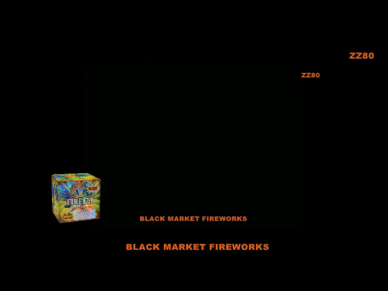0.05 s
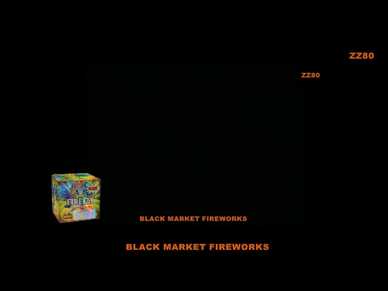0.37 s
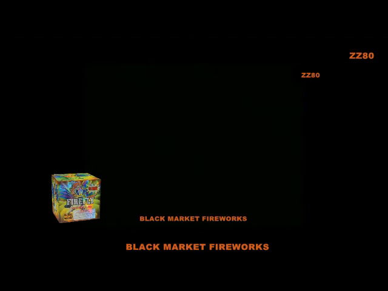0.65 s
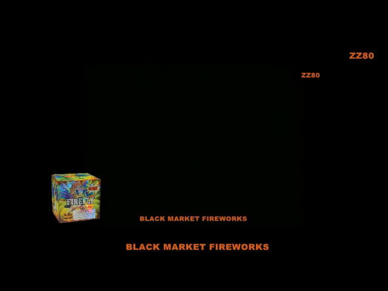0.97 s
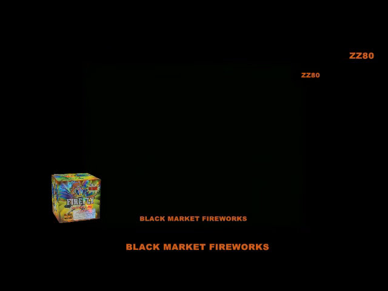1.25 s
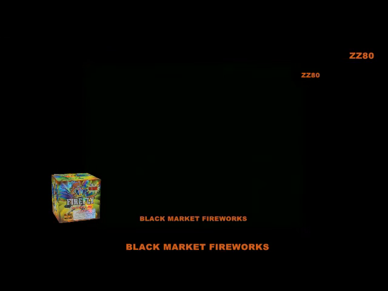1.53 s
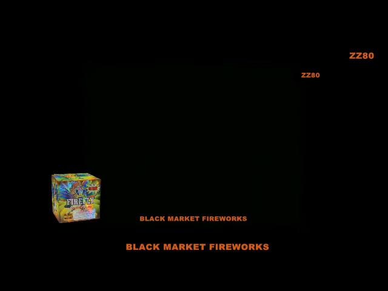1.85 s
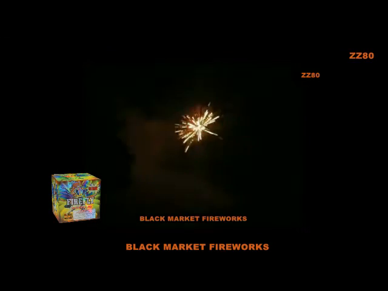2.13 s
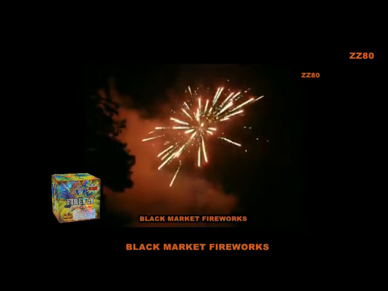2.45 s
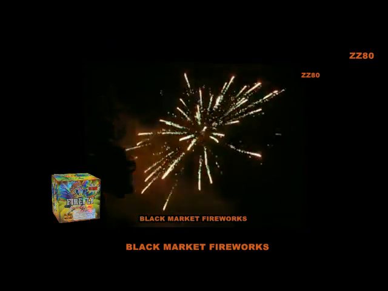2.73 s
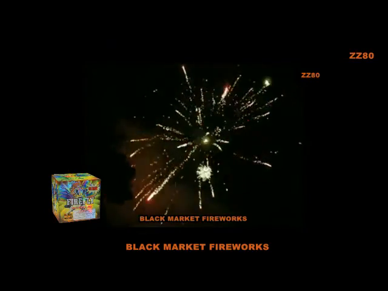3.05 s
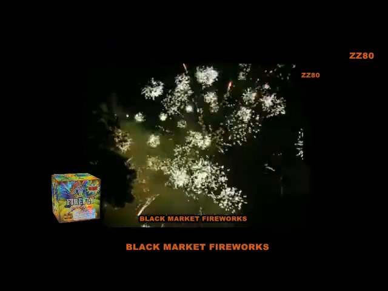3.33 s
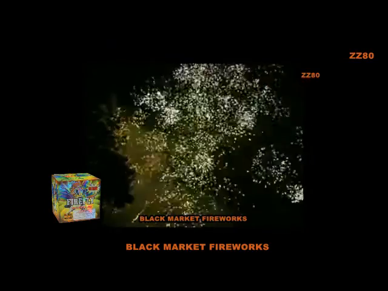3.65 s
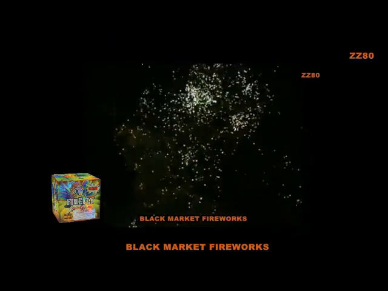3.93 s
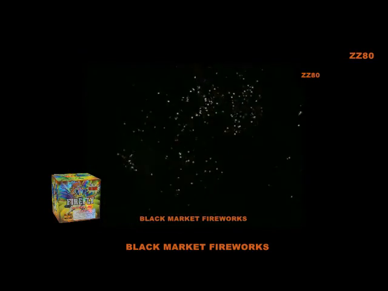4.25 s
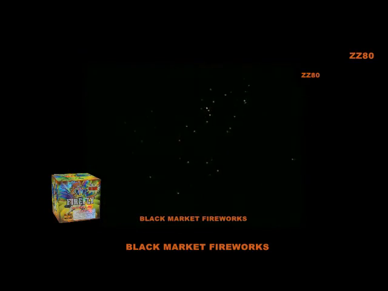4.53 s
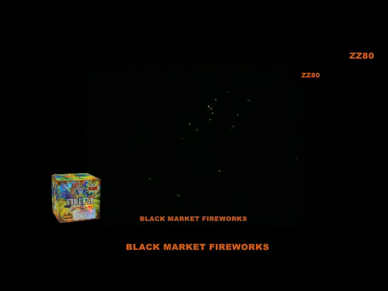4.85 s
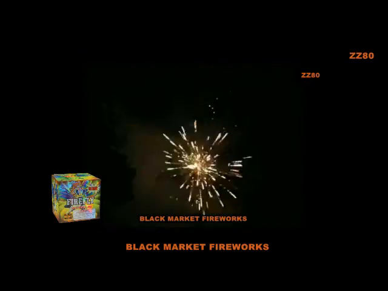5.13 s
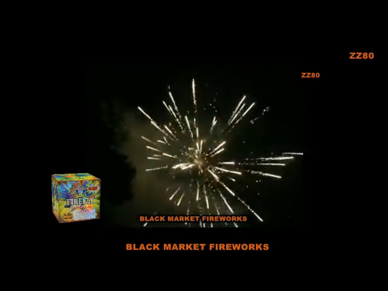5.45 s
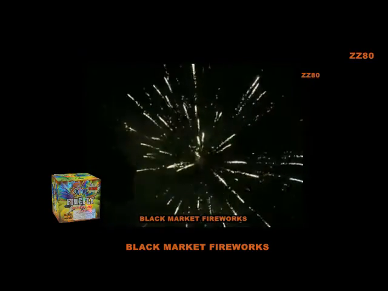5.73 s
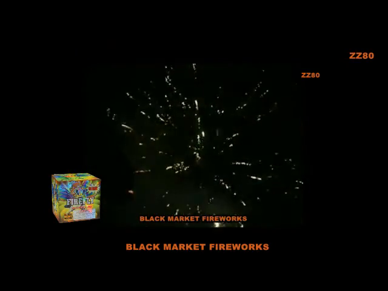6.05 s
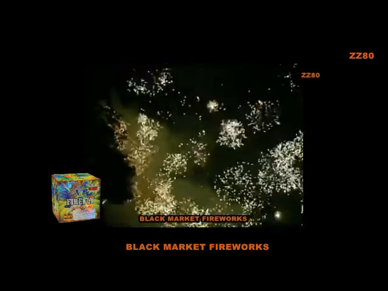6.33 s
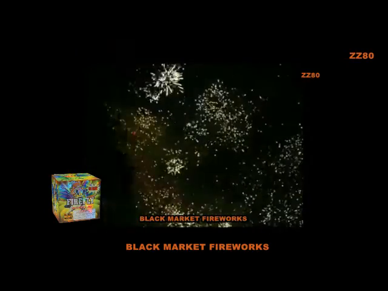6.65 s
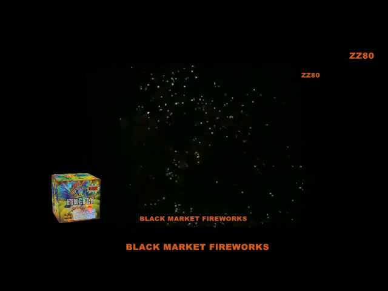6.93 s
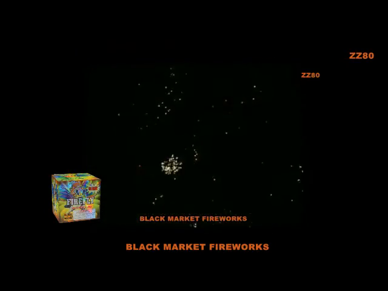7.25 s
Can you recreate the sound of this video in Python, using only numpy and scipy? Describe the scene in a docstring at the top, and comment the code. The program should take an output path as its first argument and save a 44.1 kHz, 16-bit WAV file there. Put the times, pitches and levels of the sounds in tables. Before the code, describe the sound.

Fireworks go off outdoors at night over a low rumble. Short, rough whistles fall in pitch among sharp snaps, then launch thumps and a booming shell burst give way to dense crackling. More booms and further waves of crackle follow, with a few more whistles and cracks near the end. Every blow echoes back from the surroundings, and the small microphone sounds narrow, gritty and heavily overloaded.

```python
"""Outdoors at night, among trees and houses, firework cakes fire over a low rumble.
Spinning pieces whistle down in pitch, stars break into clouds of crackle and small reports snap.
Lift charges thump and shells burst; the trees and houses roll every blow back.
A small camera with telephone-band sound is driven far into clipping."""
import sys
import numpy as np
from scipy import signal
from scipy.fft import rfft, irfft, next_fast_len
from scipy.io import wavfile
from scipy.ndimage import map_coordinates

SR = 44100
rng = np.random.default_rng(int(sys.argv[2]) if len(sys.argv) > 2 else 0)


def inscribe(sig):
    """Save sig as 16-bit PCM at rate SR to the path in sys.argv[1].

    A 1-D sig is mono; a 2-D sig holds one channel per row.
    Samples are clipped to [-1, 1] before scaling.
    """
    pcm = np.round(np.clip(np.atleast_2d(sig).T, -1, 1) * 32767)
    wavfile.write(sys.argv[1], SR, pcm.astype(np.int16))


N = 329868
TIME_S = np.arange(N) / SR


def amp(db):
    """Gain of a level in dB."""
    return 10 ** (np.asarray(db) / 20)


def unit(x):
    """x at rms 1."""
    return x / np.sqrt(np.mean(x ** 2) + 1e-20)


def shape(points):
    """Gain against frequency from (Hz, dB) points on a log axis."""
    points_hz, db = np.transpose(points)
    return lambda hz: amp(np.interp(np.log(hz + 1), np.log(points_hz), db))


def hump(centre_hz, q):
    """Gain of one broad resonance against frequency."""
    return lambda hz: 1 / np.hypot(1, q * ((hz + 1) / centre_hz - centre_hz / (hz + 1)))


def filtered(x, gain):
    """x coloured by a gain of frequency."""
    size = next_fast_len(len(x) + 8192)
    return irfft(rfft(x, size) * gain(np.fft.rfftfreq(size, 1 / SR)), size)[:len(x)]


def noise(gain, size):
    """Coloured noise at rms 1."""
    return unit(filtered(rng.standard_normal(size), gain))


def wobble(rate_hz, size):
    """Smooth random curve, rate_hz knots a second."""
    knots = rng.standard_normal(int(size * rate_hz / SR) + 4)
    return map_coordinates(knots, [np.arange(size) * rate_hz / SR])


def add(track, start_s, sound):
    """Mix a sound into the track from start_s on."""
    part = track[max(round(start_s * SR), 0):][:len(sound)]
    part += sound[:len(part)]


def since(start_s):
    """Seconds since start_s, zero before it."""
    return np.maximum(TIME_S - start_s, 0)


def scattered(x, t60_s, wet_db):
    """x plus diffuse echoes from ground and foliage."""
    t = TIME_S[:SR // 2]
    tail = rng.standard_normal(len(t)) * amp(-60 * t / t60_s)
    return x + amp(wet_db) * signal.fftconvolve(x, tail / np.linalg.norm(tail))[:N]


# Background spectrum. Each row: frequency in Hz, density in dB.
NIGHT_SPECTRUM = [(20, -13), (70, -1), (130, -3), (250, -11), (600, -20.5), (2500, -14.5), (4000, -40)]

def night():
    """Low, nearly steady outdoor rumble."""
    return amp(-38) * noise(shape(NIGHT_SPECTRUM), N) * amp(0.59 * wobble(11, N))


# Spinning pieces. Each row: start in seconds, initial pitch in Hz, full burn in seconds,
# level in dB, burnout level in dB.
SPINNERS = [(-.2, 2950, .25, -22, -31), (.3, 3040, .27, -26.5, -33.5), (0.889, 3055, .27, -29.5, -34.5),
            (1.52, 2990, .14, -33, -41), (2.66, 3856, 0.32, -26, -26), (2.74, 3010, 0.19, -26.5, -30),
            (5.761, 3020, .2, -26, -26.5), (7.299, 3033, .2, -27, -30)]

def whistles():
    """Rough, fluttering tones that sink as the charge burns down its tube, smeared by echoes."""
    sag_hz_per_s, burnout_sag_hz_per_s = 520, 1050
    burnout_s, fade_s, step_s, step_hz = 0.24, 0.025, 0.0395, 70.9
    out = np.zeros(N)
    for start_s, start_hz, burn_s, burn_db, burnout_db in SPINNERS:
        t = TIME_S[:SR] + max(-start_s, 0)
        late_s = np.maximum(t - burn_s, 0)
        step = np.minimum(late_s / step_s, 1)  # 0 to 1 as burnout begins
        sag_hz = sag_hz_per_s * (t - late_s) + step_hz * step + burnout_sag_hz_per_s * late_s
        pitch_hz = start_hz - sag_hz + 78 * wobble(600, len(t))
        fade = np.clip(np.minimum(t, burnout_s - late_s) / fade_s, 0, 1)
        level_db = burn_db + (burnout_db - burn_db) * step + 2.9 * wobble(91.4, len(t))
        add(out, start_s, fade * amp(level_db) * np.sin(2 * np.pi * np.cumsum(pitch_hz) / SR))
    return amp(0.5) * scattered(out, t60_s=1.0, wet_db=-4.5)


# Clouds of crackling stars. Each row: peak time in seconds, level in dB, 16 dB swell in seconds,
# hold in seconds, t60 in seconds, body (extra gain on the pops) in dB.
STAR_CLOUDS = [(0, -28, .1, .02, 0.77, -1), (3.428, -6.5, .17, .32, 1.27, -4.5),
               (4.484, -14, 0.068, 0.1, 0.67, 6), (4.553, -7, 0.077, 0.058, 3.27, -3.5),
               (6.291, -6, 0.15, 0.24, 2.6, -7)]

def clouds():
    """Yield (envelope, body dB) per cloud of stars: swell, hold, decay."""
    for peak_s, level_db, swell_s, hold_s, t60_s, body_db in STAR_CLOUDS:
        swell = amp(-16 * np.maximum(peak_s - TIME_S, 0) / swell_s)
        yield swell * amp(level_db - 60 * since(peak_s + hold_s) / t60_s), body_db


def sparks(spectrum, rate_hz, spread_db):
    """Tiny explosions, random in time and size, each with a short diffuse tail; rms 1."""
    fires = rng.random(N) < rate_hz / SR
    sizes = fires * amp(spread_db * np.clip(rng.standard_normal(N), -2, 2))
    decay = np.exp(-TIME_S[:SR // 8] / 0.0071)
    energy = np.abs(signal.fftconvolve(sizes ** 2, decay / decay.sum())[:N])
    tails = amp(5.0) * np.sqrt(energy) * rng.standard_normal(N)
    impulses = sizes * rng.choice([-1, 1], N)
    return unit(filtered(impulses + tails, shape(spectrum)))


# Spectra of small and larger sparks. Each row: frequency in Hz, density in dB.
SNAP_SPECTRUM = [(200, -34), (900, -20.5), (1700, -13), (2400, 1), (3200, 1), (3900, 0.5), (4600, -16.5)]
POP_SPECTRUM = [(20, -14), (60, -11.5), (120, -2), (200, -4), (330, -3), (600, 0), (900, -2), (1300, -1.5),
                (1900, -3.5), (2800, -5.5), (4400, -38)]

def crackle():
    """Embers, shot fizz and star clouds: bright snaps over duller pops, a few big ones standing out."""
    embers = amp(-39.5 - 60 * TIME_S / 12)  # last stars of earlier shots
    showers = [(embers, -1.5), *fizz(), *clouds()]
    snap_gain = np.linalg.norm([envelope for envelope, _ in showers], axis=0)
    pop_gain = np.linalg.norm([envelope * amp(body_db) for envelope, body_db in showers], axis=0)
    bunching = amp(1.37 * wobble(35, N))
    snaps = amp(-1.3) * sparks(SNAP_SPECTRUM, rate_hz=1500, spread_db=3.5)
    pops = amp(3.5) * sparks(POP_SPECTRUM, rate_hz=1100, spread_db=5.0)
    big_snaps = amp(-9.5) * sparks(TREE_SPECTRUM, rate_hz=35, spread_db=1.0)
    return bunching * (snap_gain * (snaps + big_snaps) + pop_gain * pops)


# Small reports and dull pops. Each row: start in seconds, level in dB, centre in Hz, echo in dB.
SMALL_CHARGES = [(.134, -11.5, 3200, -26.5), (.374, -10, 1260, -21), (.8138, -8.5, 1190, -19),
                 (1.381, -32, 500, -58), (1.413, -25, 450, -49), (1.433, -25.5, 500, -56),
                 (1.4707, -8.5, 1400, -19.5), (2.969, -8, 1400, -17), (5.7424, -17, 1200, -17),
                 (5.942, -6, 1390, -17.5), (7.2861, -3.5, 1510, -20), (7.3577, -5.5, 1000, -19)]
# Prominent clusters of stars. Each row: start in seconds, level in dB, t60 in seconds.
STAR_CLUSTERS = [(3.155, -9, 0.11), (3.190, -9.5, 0.11), (3.2198, -6.5, 0.12), (3.2741, -0.5, 0.13),
                 (3.362, -7, .12), (3.8264, -7, 0.14), (6.1235, -2, 0.043), (6.174, -6.5, 0.063),
                 (6.215, -3.5, 0.1), (6.66, -1, 0.075), (6.7775, -4, 0.038), (6.8037, -5, 0.084),
                 (6.865, -7.5, 0.1), (6.9424, -5, 0.087), (7.1033, -9.5, .07)]
# Spectrum of the tree echo, also of the big snaps. Each row: frequency in Hz, density in dB.
TREE_SPECTRUM = [(60, -17), (150, -12), (400, -9.5), (900, -2.5), (1600, -1), (2700, 0.5), (3400, -10),
                 (4200, -13)]

def reports():
    """Shock front and ragged crack per charge or cluster, then a long wash from the trees."""
    out, t = np.zeros(N), TIME_S[:2 * SR]
    single_t60_s, cluster_hz = 0.031, 2530
    singles = [(start_s, db, hz, single_t60_s, echo_db) for start_s, db, hz, echo_db in SMALL_CHARGES]
    clusters = [(start_s, db, cluster_hz, t60_s, db - 16.5) for start_s, db, t60_s in STAR_CLUSTERS]
    for start_s, level_db, centre_hz, t60_s, echo_db in singles + clusters:
        phase = np.pi * centre_hz * t  # smaller charges make shorter, brighter fronts
        front = amp(12.0) * phase * (2 - phase) * np.exp(-phase)
        band = lambda hz: hump(centre_hz, q=0.7)(hz) / np.hypot(1, (hz / (1.8 * centre_hz)) ** 2)
        crack = noise(band, len(t)) * amp(-60 * t / t60_s)
        decay = amp(-60 * t / 0.83) + amp(-7.0 - 60 * t / 3.5)
        echo = noise(shape(TREE_SPECTRUM), len(t)) * decay * (1 - np.exp(-t / 0.0021))
        add(out, start_s, amp(level_db + 0.5) * (front + crack) + amp(echo_db - 2.0) * echo)
    return out


def echoes(centre_hz, size):
    """Dense, fluttering echoes of a boom; distance takes their treble."""
    band = lambda hz: hump(centre_hz, q=1.4)(hz) / np.hypot(1, (hz / 800) ** 4)
    return noise(band, size) * amp(2.3 * wobble(34.68, size))


# Lift charges and shell bursts. Each row: start in seconds, blast level in dB and frequency in Hz,
# roar level in dB and centre in Hz, roar swell and t60 in seconds, roll level in dB and centre in Hz,
# fizz level in dB and hold in seconds.
SHOTS = [(1.654, 10, 147, -4, 182, 0.0095, 1, -19, 256, -10, 0.077),
         (1.969, 17.5, 62.6, -4.5, 235, 0.013, 1.7, -11, 290, -3, 0),
         (2.218, 13, 53.7, 3.5, 526, 0.066, 1.4, -10, 580, -5, 0.19),
         (3.875, 9, 68, 5.5, 345, 0.026, 1.46, -11.5, 215, -2.5, 0.14),
         (5.040, 10.5, 48.7, 0, 207, 0.041, 1.4, -12, 145, -2.5, 0.021),
         (5.136, 11, 56, 8, 406, 0.084, 1.03, -8, 405, -5.5, 0.2)]

def booms():
    """Torn pressure swing and its slap from a wall, then the roar of near echoes and roll of far ones."""
    out, t = np.zeros(N), TIME_S[:3 * SR]
    slap_delay_s = 0.13
    for start_s, blast_db, blast_hz, roar_db, roar_hz, swell_s, t60_s, roll_db, roll_hz, *_ in SHOTS:
        cycles = t * blast_hz
        swing = np.sin(2 * np.pi * cycles) * np.exp(-(cycles / 0.5) ** 2)
        tear = amp(-13.5 - 60 * t / 0.033) * noise(hump(460, q=0.9), len(t))
        blast = amp(blast_db) * (swing + tear)
        roar = amp(roar_db - 60 * t / t60_s) * (1 - np.exp(-t / swell_s)) * echoes(roar_hz, len(t))
        roll = amp(roll_db - 60 * t / 4.26) * (1 - np.exp(-t / 0.17)) * echoes(roll_hz, len(t))
        rumble = amp(-19.5 - 60 * t / 4.2) * noise(hump(110, q=0.77), len(t))
        thud = amp(-4.5 - 60 * t / 0.14) * noise(hump(36, q=0.66), len(t))
        add(out, start_s, blast + roar + roll + rumble + thud)
        add(out, start_s + slap_delay_s, amp(-19) * blast)
    return out


def fizz():
    """Yield (envelope, body dB) for each shot's spray of sparks."""
    swell_s, t60_s, body_db = 0.013, 1.64, -2.5
    for start_s, *_, level_db, hold_s in SHOTS:
        swell = 1 - np.exp(-since(start_s) / swell_s)
        yield swell * amp(level_db - 60 * since(start_s + hold_s) / t60_s), body_db


def scene():
    """The display over the night rumble, mono."""
    return (night() + booms() + reports() + crackle() + whistles())[None]


def record(dry):
    """The converter clips hard at a low sample rate; a soft overload then adds thin, gritty treble."""
    converter_hz, cutoff_hz = 8000, 15900
    ceiling, knee = 1.25, 1.2
    narrow = signal.resample(dry[0], N * converter_hz // SR)
    clipped = np.clip(narrow, -0.7, 0.7)
    gritty = clipped * (1 + amp(-22.5) * rng.standard_normal(len(clipped)))
    band_limit = signal.firwin(17641, converter_hz / 2, fs=SR * 80)
    upsampled = signal.resample_poly(gritty, up=441, down=80, window=band_limit)[:N]
    saturated = upsampled / (1 + np.abs(upsampled / ceiling) ** knee) ** (1 / knee)
    treble = shape([(4000, -1), (5000, 2.5), (7000, 2.0), (9000, 1.5), (11500, 0.0), (15500, 2.0)])
    return filtered(saturated, lambda hz: treble(hz) * (hz < cutoff_hz))[None]


dry = scene()
out = record(dry)
inscribe(out)
```